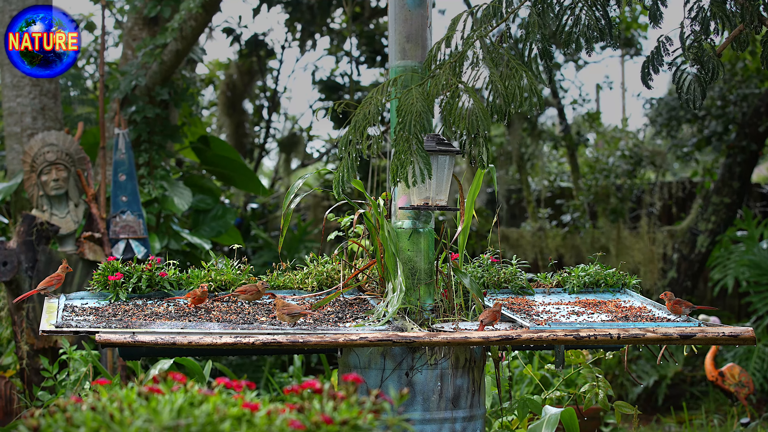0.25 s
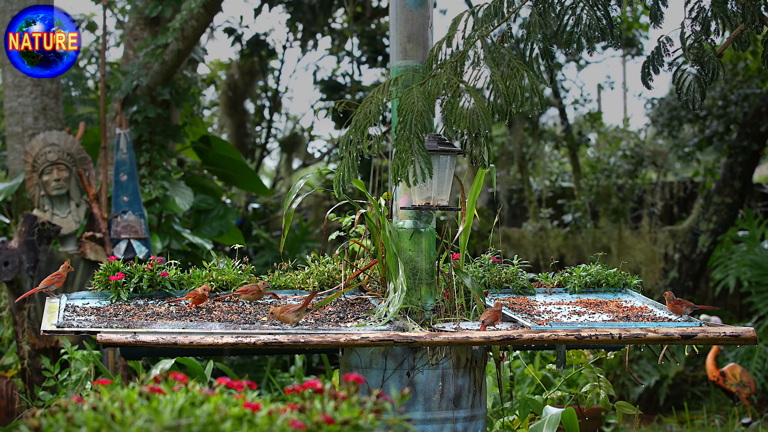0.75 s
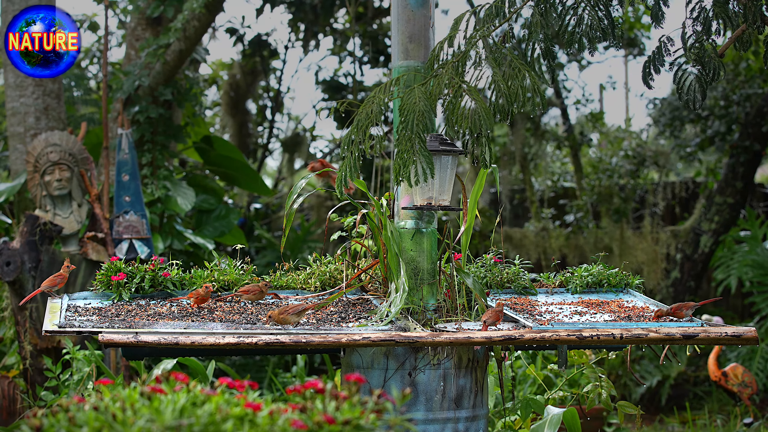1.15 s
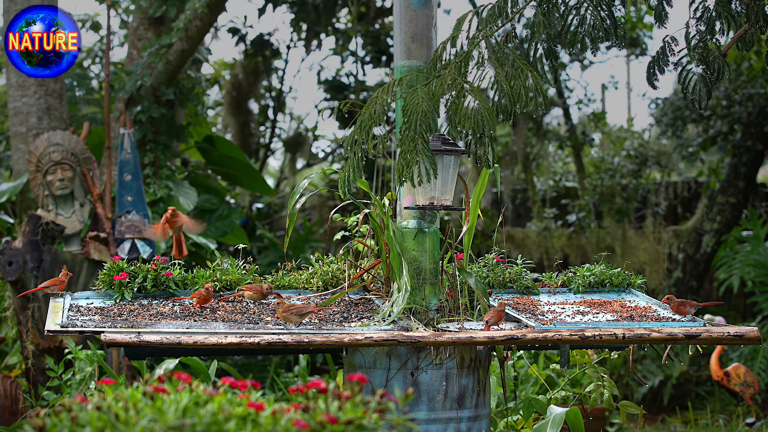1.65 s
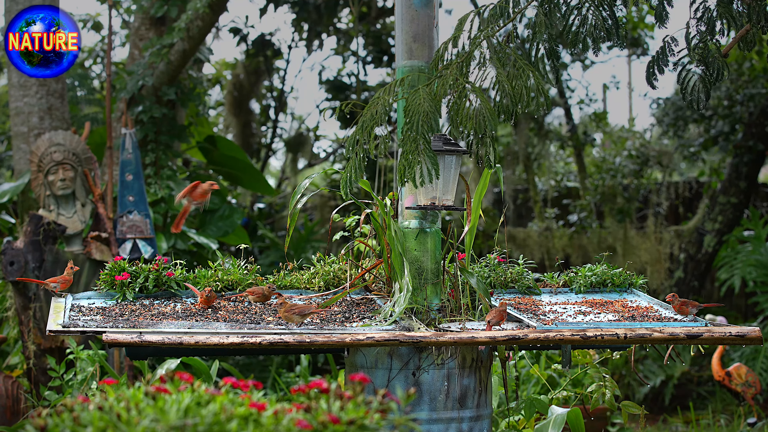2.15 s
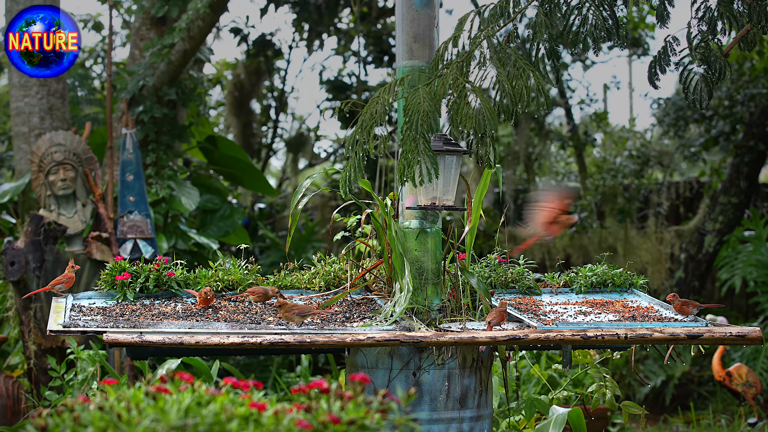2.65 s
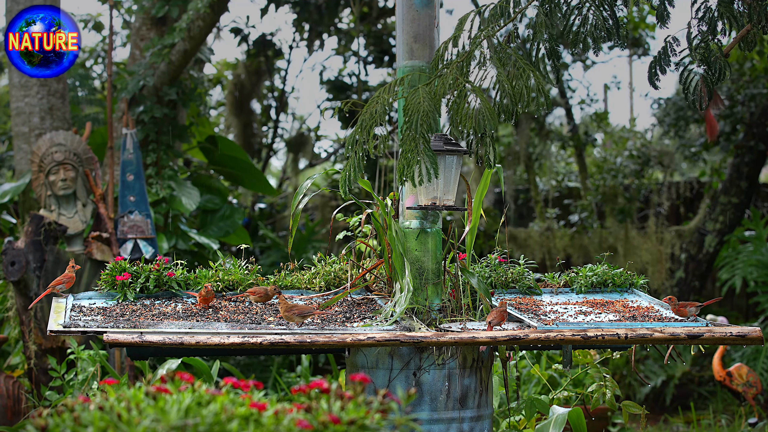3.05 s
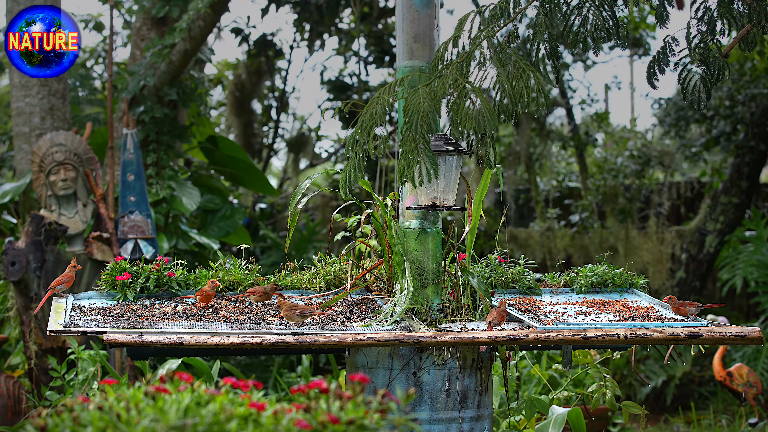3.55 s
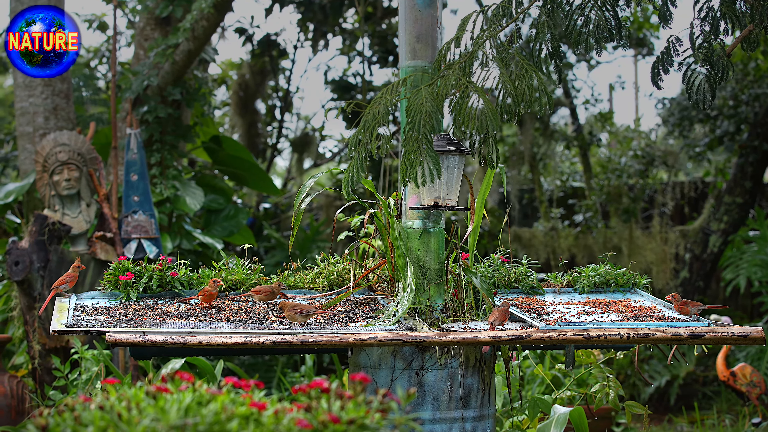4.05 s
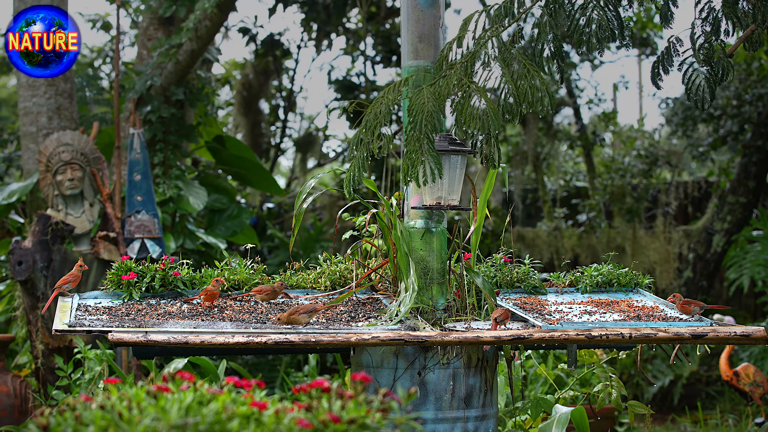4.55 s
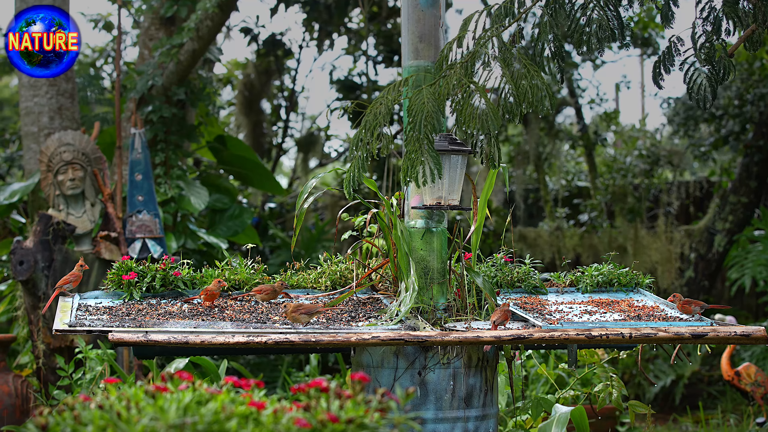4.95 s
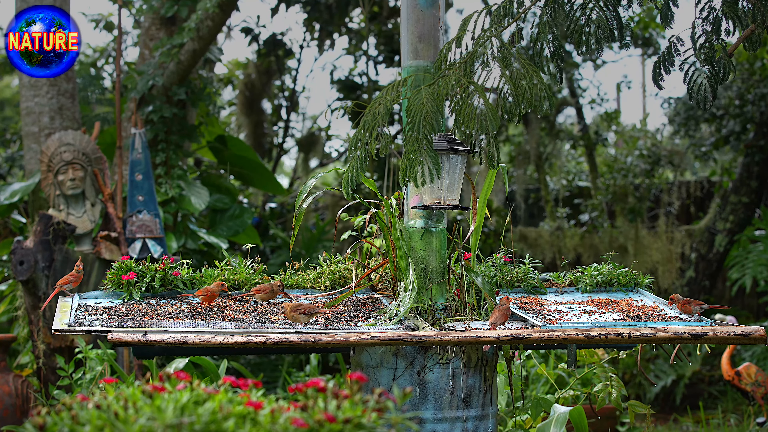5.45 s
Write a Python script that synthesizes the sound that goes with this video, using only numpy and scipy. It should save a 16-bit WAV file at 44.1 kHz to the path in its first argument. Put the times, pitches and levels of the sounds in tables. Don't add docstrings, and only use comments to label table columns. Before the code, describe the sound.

Steady fine trickling with bright ticks and plinking drips surrounds a pair of microphones. In the middle, a bird's pure whistles grow from faint to clear, ending in a fast run of chirps around four seconds, lightly echoed by walls and leaves. Underneath lie distant engine drone, passing hums and low rumble, with deep wind bumps near the end.

```python
import sys
import numpy as np
from scipy import signal
from scipy.fft import rfft, irfft, next_fast_len
from scipy.io import wavfile
from scipy.ndimage import uniform_filter1d

SR = 44100
rng = np.random.default_rng(int(sys.argv[2]) if len(sys.argv) > 2 else 0)


def field_ratio(decibels):
    return 10 ** (np.asarray(decibels, dtype=float) / 20)


def master(y):
    cut = np.clip(np.atleast_2d(y).T, -1, 1)
    pcm = np.round(cut * 32767)
    wavfile.write(sys.argv[1], SR, pcm.astype(np.int16))


N = 251811


def evened(x):
    return x / np.sqrt(np.mean(x ** 2) + 1e-20)


def read(f, value, hz):
    return np.interp(np.log(hz + 1), np.log(np.add(f, 1)), value)


def add(mix, s, sound):
    part = mix[round(s * SR):][:len(sound)]
    part += sound[:len(part)]


def coloured(x, gain):
    size = next_fast_len(N)
    return irfft(rfft(x, size) * gain(np.fft.rfftfreq(size, 1 / SR)), size)[:N]


def drift(size):
    noise = uniform_filter1d(rng.standard_normal(N), size)
    return evened(uniform_filter1d(noise, size))


def wavelet(hz, width_hz, phase, rise=0.65):
    u = np.arange(round(6 * SR / width_hz)) / SR * width_hz
    envelope = (1 - np.exp(-u / rise)) * np.exp(-2.0 * u)
    ring = envelope * np.sin(2 * np.pi * hz / width_hz * u + phase)
    return ring / np.linalg.norm(ring)


def burst(decay_s, size):
    noise = rng.standard_normal(size) * np.exp(-np.arange(size) / SR / decay_s)
    return noise / np.linalg.norm(noise)


def water(hiss_db=-0.5, fine_db=-3, spread_db=3.0, per_s=1800, clump_db=2.4):
    fine = np.zeros(N)
    for hz in np.geomspace(1200, 15000, num=16):
        strike = rng.random(N) < per_s / 16 / SR
        size = field_ratio(spread_db * np.minimum(rng.exponential(1, N), 2.5)) * strike
        fine += hz ** (2 / 3) * signal.oaconvolve(size, wavelet(hz, .5 * hz, 0))[:N]
    bed = field_ratio(hiss_db) * rng.standard_normal(N) + field_ratio(fine_db) * evened(fine)
    return bed * field_ratio(clump_db * drift(size=300))


# (time [s], level over the trickle [dB], centre pitch [Hz])
DRIPS = [(.29, 14, 7100), (.5203, 13.5, 4100), (.567, 14, 3500), (.813, 17.5, 1510), (.8196, 16, 3450),
         (.9894, 21, 3150), (1.1906, 17, 3100), (1.2078, 23, 5400), (1.2085, 11, 3790), (1.216, 18, 6030),
         (1.2362, 15, 5500), (1.4448, 17, 5100), (2.075, 13.5, 1580), (2.474, 16.5, 3840),
         (2.9141, 12, 2400), (3.1047, 15.5, 3370), (3.287, 7, 3000), (3.3213, 16, 1720), (3.6738, 15, 4166),
         (4.1215, 17, 4600), (4.455, 15.5, 4600), (4.518, 14, 1650), (4.5849, 13, 4130), (4.6643, 13, 3500),
         (4.9755, 12, 4480), (5.1537, 11.5, 3493), (5.4425, 10, 3480), (5.6159, 21, 3550),
         (5.685, 16.5, 1570)]
# (time [s], level over the trickle [dB], centre pitch [Hz])
SPRAY = [(.3, 7, 11500), (.5205, 14, 11000), (.566, 12, 11600), (.578, 5, 10680), (.8054, 14, 12000),
         (.9803, 16, 12500), (.9908, 9, 12920), (1.0137, 13, 11540), (1.2604, 17, 11540),
         (1.358, 11, 11220), (1.4576, 13.5, 9300), (1.718, 20, 11600), (1.7995, 13, 11200),
         (1.9013, 12, 10900), (2.1544, 6, 12500), (2.4755, 10, 12600), (2.4836, 13, 10600),
         (2.894, 19, 12200), (2.9206, 17, 13300), (3.6738, 12, 10700), (3.8557, 11, 9200),
         (3.9814, 13, 10160), (4.121, 15, 9900), (4.3472, 13, 12230), (4.411, 15, 11100),
         (5.0057, 15, 9900), (5.0965, 14, 9450), (5.4417, 14.5, 10900), (5.6628, 11, 11020)]


def ticks(spray_top_hz=14650, drip_width=.47):
    s, size, pitch = rng.random((2, 80, 3)).T
    stray_per_s, stray_db = 6, 9.5
    faint_per_s, faint_db = 7, 9
    stray = np.transpose([s[:, 0] * len(s) / stray_per_s,
                          stray_db + 5 * size[:, 0],
                          10000 + 2700 * pitch[:, 0]])
    faint = np.transpose([s[:, 1] * len(s) / faint_per_s,
                          faint_db + 5 * size[:, 1],
                          1500 * 3.5 ** pitch[:, 1]])
    rows = [(s, db, hz, max(2 * (spray_top_hz - hz), 1500)) for s, db, hz in [*SPRAY, *stray]]
    rows += [(s, db, hz, drip_width * hz) for s, db, hz in [*DRIPS, *faint]]
    return [row for row in rows if row[0] < N / SR]


def drips(rows, tail_db=-6, tail_s=0.012):
    out = np.zeros(N)
    phases = 2 * np.pi * rng.random(len(rows))
    for (s, db, hz, width_hz), phase in zip(rows, phases):
        ring = np.convolve(wavelet(hz, 1.19 * width_hz, phase), burst(0.00084, size=300))
        ring /= np.linalg.norm(ring)
        add(out, max(s - .0008, 0), field_ratio(db) * np.sqrt(width_hz / 180) * ring)
    return out + field_ratio(tail_db) * signal.oaconvolve(out, burst(tail_s, size=4000))[:N]


# (time [s], level [dB], length [s])
SWELLS = [
    (0.688, 1.5, .02),
    (2.505, 1.5, .04),
    (3.23, 3, 0.056),
    (3.593, 3, .05),
]


def flow(rows, surge_db=1, surge_s=0.014, wander_db=1.3):
    kicks = np.zeros(N)
    for s, db, *_ in rows:
        add(kicks, s, np.array([db / 15]))
    surge = signal.lfilter([1], [1, -np.exp(-1 / SR / surge_s)], kicks)
    t = np.arange(N) / SR
    pours = sum(db * np.exp(-((t - s) / length) ** 2) for s, db, length in SWELLS)
    return field_ratio(pours + surge_db * (surge - surge.mean()) + wander_db * drift(size=1500))


# (pitch [Hz], level per Hz [dB])
TRICKLE = [(24, -29), (40, -1), (159, -10), (185, -11), (283, -10), (329, -8), (392, -10.5), (570, -10),
           (1120, -11), (2210, -14.5), (2980, -13.5), (5870, -22), (9450, -17.5), (12800, -21.5),
           (16000, -31)]
# (pitch [Hz], lead of the sides [radians], likeness [0-1], sides over middle [dB])
PAIR = [(170, 0.8, 0.09, -14.2), (350, -2.7, 0.25, -6.4), (520, -5.0, 0.35, -5.5), (780, -7.5, 0.49, -3.5),
        (1200, -9.6, 0.64, -2.3), (1600, -11.3, 0.65, -2.0), (2100, -12.9, 0.75, -0.4),
        (2900, -14.5, 0.69, 1.9), (3900, -15.9, 0.72, 0.2), (5000, -17.0, 0.27, -1.7),
        (6500, -19.5, 0.43, 0.0), (9000, -21.0, 0.53, 4.0), (12000, -21.8, 0.71, 4.2),
        (15600, -22.2, 0.73, 2.0)]


def spread(bed, gain, rows, trickle_db=-61.5):
    f, lead, like, over_db = np.transpose(PAIR)
    like = np.clip(like, 0, .99)

    def colour(hz):
        return field_ratio(read(*np.transpose(TRICKLE), hz))

    def shared(hz):
        return read(f, like, hz) * field_ratio(-read(f, over_db, hz)) * np.exp(-1j * read(f, lead, hz))

    def unrelated(hz):
        return colour(hz) * np.sqrt(1 - read(f, like, hz) ** 2) * field_ratio(-read(f, over_db, hz))

    scale = field_ratio(trickle_db) / np.sqrt(np.mean(colour(np.linspace(0, SR / 2, num=4000)) ** 2))
    side = coloured(bed * gain + drips(rows), colour)
    hiss = field_ratio(1.0) * rng.standard_normal(N) * np.sqrt(gain)
    hush = coloured(hiss + field_ratio(-1) * drips(rows), unrelated)
    middle = coloured(side, shared) + hush
    return scale * np.array([middle + side, middle - side])


def tones(rows, multiples, waver_db):
    s, hz, *levels = np.transpose(rows)
    t = np.arange(N) / SR
    turns = np.cumsum(np.interp(t, s, hz)) / SR
    out = np.zeros(N)
    for k, db in zip(multiples, levels):
        level = field_ratio(np.interp(t, s, db, -120, -120) + waver_db * drift(size=2500))
        out += np.sqrt(2) * level * np.sin(2 * np.pi * (k * turns + rng.random()))
    return out


def idling_engine(cycle_hz=17.67, stop_s=2.75, fade_s=0.12):
    levels_db = (-52, -59, -61.5, -83)
    fades = ((0, 0), (stop_s, 0), (stop_s + fade_s, -20))  # (s, dB)
    rows = [(s, cycle_hz, *np.add(levels_db, db)) for s, db in fades]
    return tones(rows, (2, 5, 7, 9), 1.3)


# (start [s], end [s], start pitch
# [Hz], end pitch [Hz], level [dB])
HUMS = [(0, 2.8, 94.3, 94, -61), (-.2, .95, 159, 159, -66), (0, 1.4, 224, 222, -69),
        (2.9, 3.35, 188, 190, -64), (3.25, 3.9, 196, 195, -60), (3.9, 4.3, 197, 197, -67),
        (3.6, 4.4, 127, 126, -62), (4.3, 4.85, 160, 167, -64), (4.47, 4.75, 199, 205, -62),
        (5.25, 5.5, 237, 240, -67), (3.9, 5.0, 985, 985, -74), (4.75, 5.12, 657, 657, -73),
        (5.1, 5.85, 91.5, 98, -56)]


def hums():
    out = np.zeros(N)
    for start, end, hz0, hz1, db in HUMS:
        t = np.arange(0, end - start, 1 / SR)
        turns = np.cumsum(np.linspace(hz0, hz1, len(t))) / SR + rng.random()
        tone = np.sin(2 * np.pi * turns) * signal.windows.tukey(len(t), .4)
        add(out, max(start, 0), np.sqrt(2) * field_ratio(db) * tone)
    return out


# (pitch [Hz], level per Hz [dB])
RUMBLE = [(10, 2), (25, -1), (45, -6), (90, -7), (140, -15), (250, -21), (400, -50)]
# (time [s], peak level [dB], length [s])
GUSTS = [
    (2.091, -51, 0.042),
    (3.103, -50.5, 0.2),
    (3.62, -46.5, 0.23),
    (4.347, -65, 0.078),
    (4.952, -42, 0.095),
    (5.53, -46.5, 0.13),
]
# (time [s], peak level [dB], pitch [Hz], length [cycles])
THUMPS = [
    (2.745, -40.5, 44.3, 3.3),
    (4.871, -38.5, 30.2, 0.4),
    (4.929, -30.5, 57, 1.14),
    (4.999, -32, 37.6, 0.93),
    (5.549, -35.5, 50.6, 1),
    (5.673, -36.5, 33.4, 1.5),
]


def wind(rumble_db=-54, calm_db=-82):
    t = np.arange(N) / SR
    rumble = coloured(rng.standard_normal(N), lambda hz: field_ratio(read(*np.transpose(RUMBLE), hz)))
    gusts = coloured(rng.standard_normal(N), lambda hz: np.exp(-((hz - 21) / 9) ** 2))
    strength = field_ratio(calm_db) + sum(field_ratio(db) * np.exp(-((t - s) / length) ** 2) for s, db, length in GUSTS)
    out = field_ratio(rumble_db) * evened(rumble) + evened(gusts) * strength
    for s, db, hz, cycles in THUMPS:
        u = (t - s) * hz
        out -= field_ratio(db) * np.exp(-(2 * u / cycles) ** 2) * np.cos(2 * np.pi * u)
    return out


# (time from the peak [s], pitch [Hz], level under the peak [dB])
FALL = [(-.022, 1794, -13), (-.01, 2158, -2), (0, 2195, 1.5), (.022, 1942, 3), (.05, 1690, -1.5),
        (.1, 1407, -21)]
LEAP = [(-.177, 1940, -13), (-.117, 2070, -18.5), (-.067, 2277, -10), (-.032, 2481, -7), (-.015, 3100, -1),
        (0, 3200, -2), (.015, 3110, -1), (.028, 3220, -14)]
SLUR = [(-.285, 1480, -28.5), (-.21, 1665, -24.5), (-.14, 1775, -15), (-.088, 1990, -10.5),
        (-.043, 2200, -13), (-.014, 2438, -2), (0, 2570, -0.5), (.02, 2535, -9.5), (.036, 2350, -16)]
DROP = [(-.022, 7570, -31), (-.016, 6060, -10), (-.008, 4940, -4), (0, 4150, -0.5), (.01, 3250, -4),
        (.02, 2660, -18)]
DIP = [(-.017, 7150, -32), (-.011, 5730, -16), (-.004, 4440, -0.5), (.004, 3910, 0), (.012, 3070, -2),
       (.021, 2490, -9)]
FLICK = [(-.038, 1660, -15), (-.025, 1992, -9), (-.01, 2260, -4.5), (0, 2645, 1.5), (.008, 2750, -9),
         (.018, 2590, -9)]
# (time of the peak [s], peak level [dB], pitch factor [ratio], stretch [ratio])
FALLS = [
    (1.49, -65.5, 1.03, .98),
    (2.163, -59.5, 1.02, 0.99),
    (2.91, -56, 1.001, 1.1),
]
LEAPS = [
    (1.798, -48.5, 1.001, 1.01),
]
SLURS = [
    (2.682, -40, 1.003, .99),
    (3.405, -39, .997, 1.01),
]
DROPS = [
    (3.58, -42, 1.023, 0.94),
]
DIPS = [
    (3.76, -46.5, 1.005, 1.01),
    (3.947, -50, .97, .99),
]
FLICKS = [
    (3.709, -44.5, 1.01, 0.85),
    (3.895, -47.5, .99, 1.1),
]


def song():
    dry = np.zeros(N)
    syllables = ((FALL, FALLS), (LEAP, LEAPS), (SLUR, SLURS), (DROP, DROPS), (DIP, DIPS), (FLICK, FLICKS))
    for shape, notes in syllables:
        s, hz, db = np.transpose(shape)
        for peak_s, peak_db, factor, stretch in notes:
            u = np.arange(s[0], s[-1], 1 / SR / stretch)
            pitch = factor * uniform_filter1d(np.interp(u, s, hz), size=90, mode="nearest")
            tone = np.sin(2 * np.pi * np.cumsum(pitch) / SR) * signal.windows.tukey(len(u), .1)
            level = np.sqrt(2) * field_ratio(peak_db + np.interp(u, s, db))
            add(dry, peak_s + s[0] * stretch, level * tone)
    return dry


# (delay [s], level [dB])
ECHOES = [
    (.03, -15.5),
    (.054, -13),
    (.085, -20),
    (.115, -23.5),
]
# (time after the note [s], level [dB])
SCATTER = [(.004, -19.5), (.02, -24), (.058, -24.5), (.068, -33), (.125, -37.5), (.14, -44), (.28, -47)]


def bird(leaves_hz=3600, leaves_db=-7):
    dry = song()
    t = np.arange(SR // 3) / SR
    scatter = rng.standard_normal((2, len(t))) * (rng.random((2, len(t))) < .1)
    scatter *= field_ratio(np.interp(t, *np.transpose(SCATTER), -120, -120))
    walls = np.zeros(len(t))
    for delay, db in ECHOES:
        add(walls, delay, field_ratio(db) * burst(0.0049, size=800))

    def low_cut_db(hz):
        return leaves_db / (1 + (hz / leaves_hz) ** 6)

    bright = coloured(dry, lambda hz: field_ratio(low_cut_db(hz)))
    dull = coloured(dry, lambda hz: field_ratio(-6.5 - 1.57 * low_cut_db(hz)))
    stir = 2 * np.pi * 7.0 * np.arange(N) / SR
    shared = bright * np.array([np.cos(stir), np.sin(stir)])
    echoes = signal.oaconvolve(dull, walls)[:N]
    return dry + echoes + signal.oaconvolve(shared, scatter, axes=1).sum(0)[:N]


# (time [s], firing rate [Hz], effort [dB])
PULL = [(2.9, 36.9, -88), (3.03, 38.5, -59), (3.2, 43.4, -47), (3.33, 48.27, -43), (3.47, 50.22, -40.5),
        (3.7, 51.33, -43), (3.93, 52.33, -50.5), (4.2, 54.74, -47), (4.45, 56.45, -47.5),
        (4.62, 57.9, -62.5), (4.8, 60.7, -58), (5.3, 62.15, -56.5), (5.55, 64.4, -51.5), (5.71, 63.2, -54)]
# (pitch [Hz], level [dB])
PIPE = [(75, -7), (87, 3), (98, -11), (112, -18.5), (121, -8), (126, -1)]


def departing_engine():
    rows = [(s, hz, db, db + read(*np.transpose(PIPE), 2 * hz)) for s, hz, db in PULL]
    return tones(rows, (1, 2), 1.2)


def scene():
    low = wind() + idling_engine() + departing_engine() + hums()
    rows = ticks()
    late = np.roll(low, round(.031 * SR))
    apart = field_ratio(-18.5) * coloured(late, lambda hz: (hz / 50) ** 0.52)
    return bird() + low + np.array([apart, -apart]) + spread(water(), flow(rows), rows)


def top_cut(x):
    return signal.sosfilt(signal.butter(12, 15840, fs=SR, output="sos"), x)


def record(dry):
    return top_cut(dry)


dry = scene()
out = record(dry)
master(out)
```